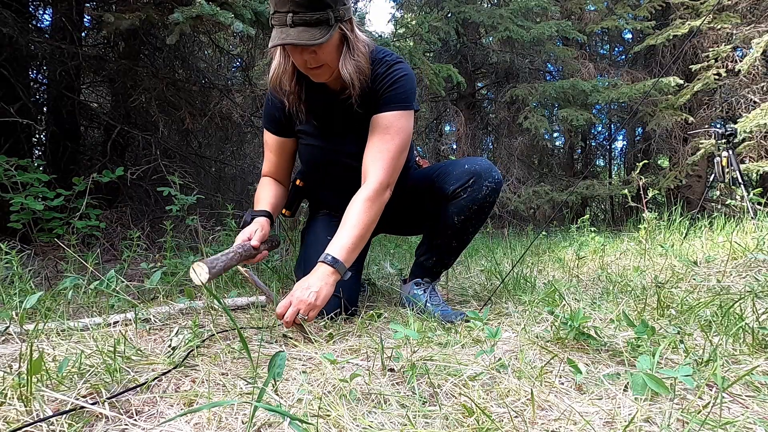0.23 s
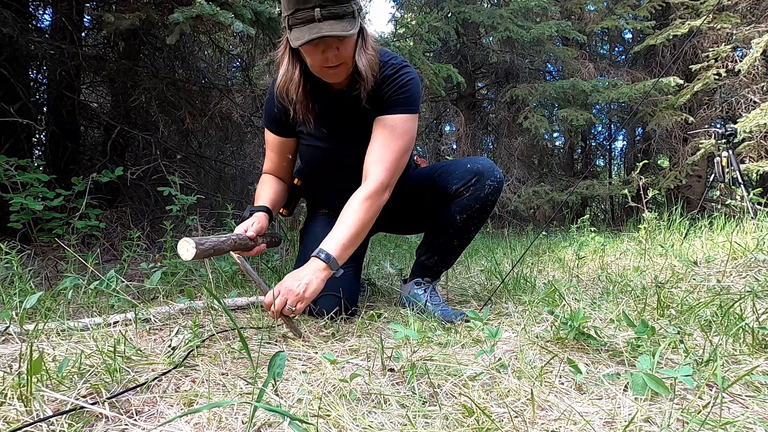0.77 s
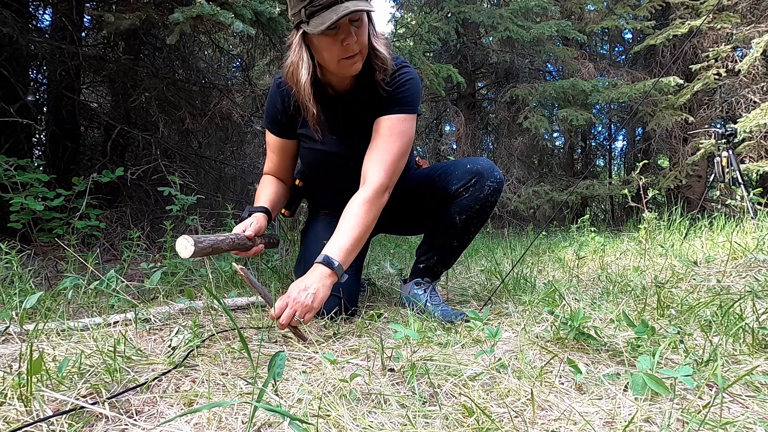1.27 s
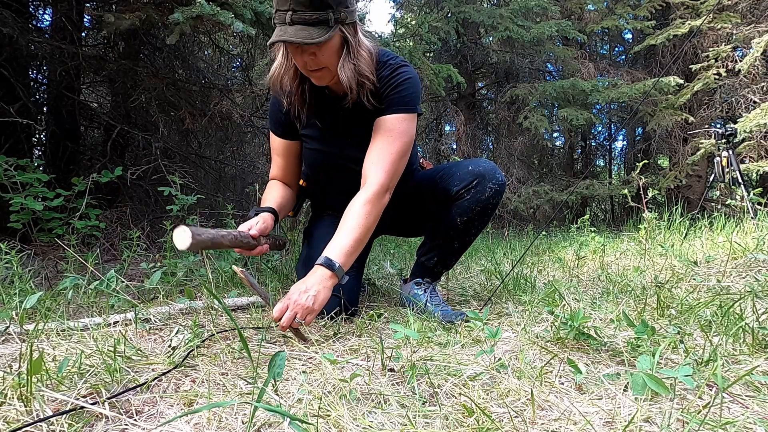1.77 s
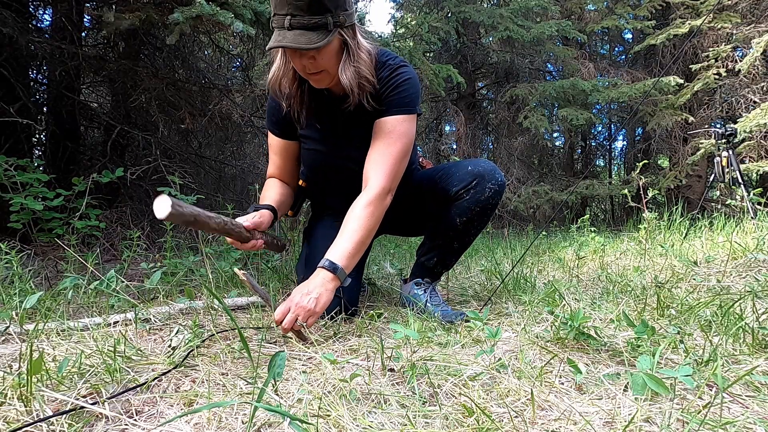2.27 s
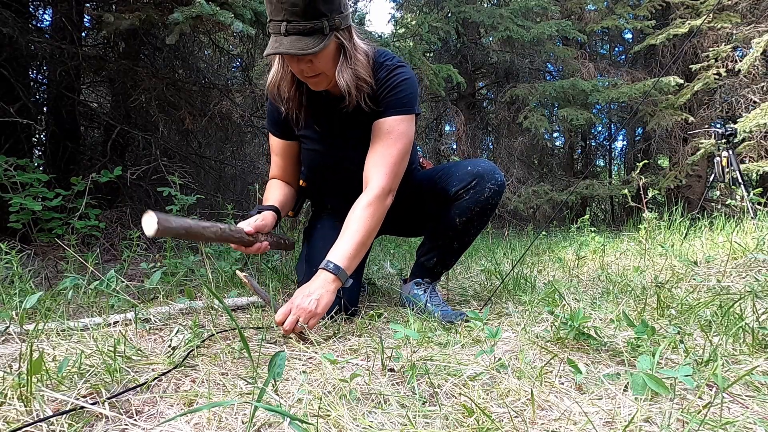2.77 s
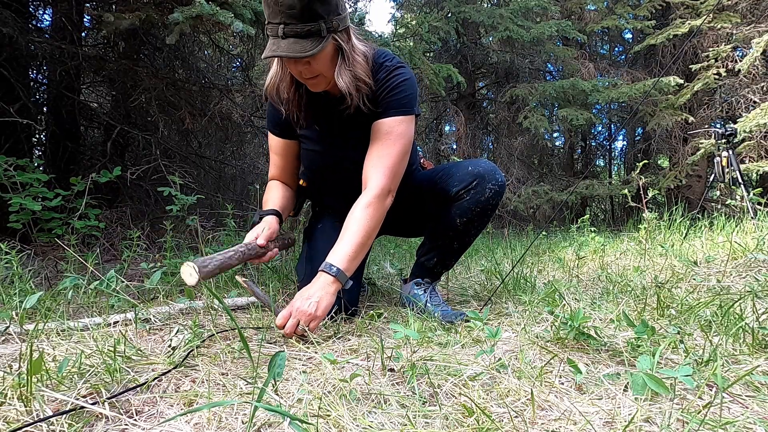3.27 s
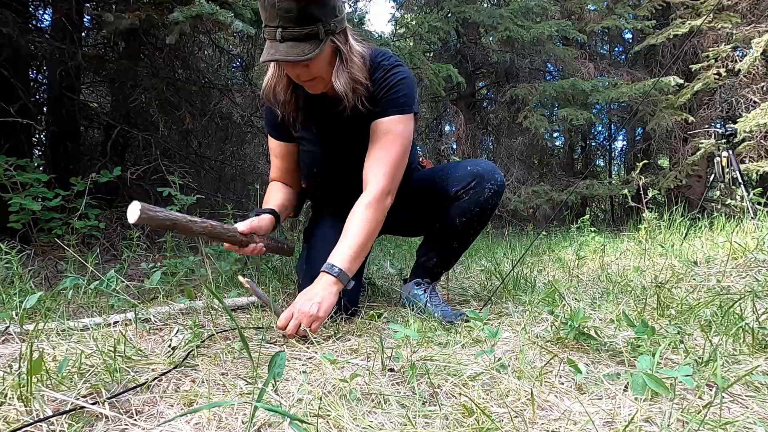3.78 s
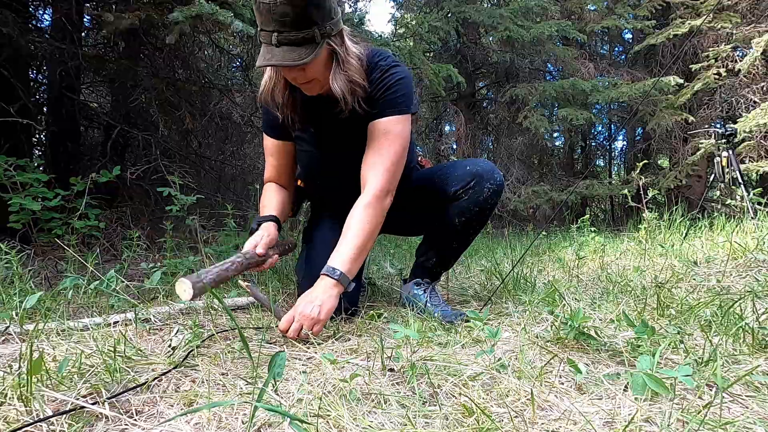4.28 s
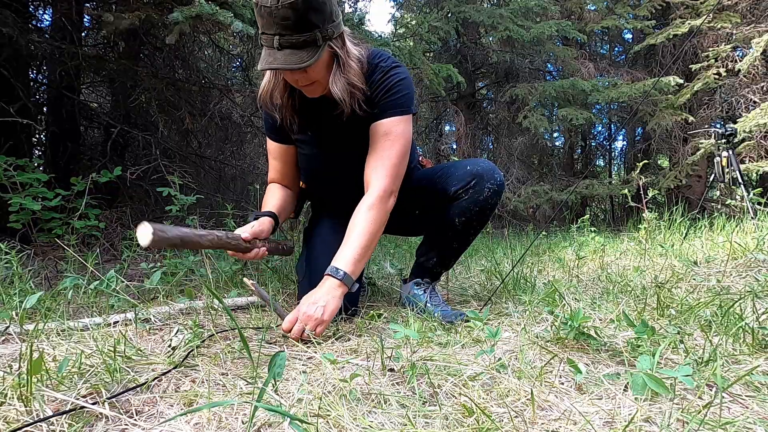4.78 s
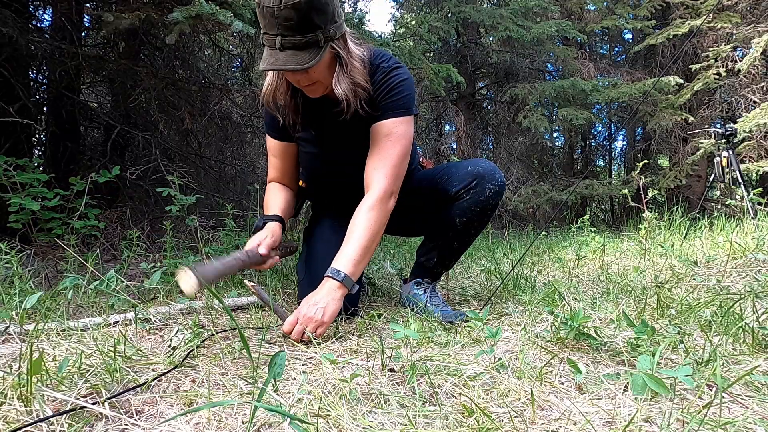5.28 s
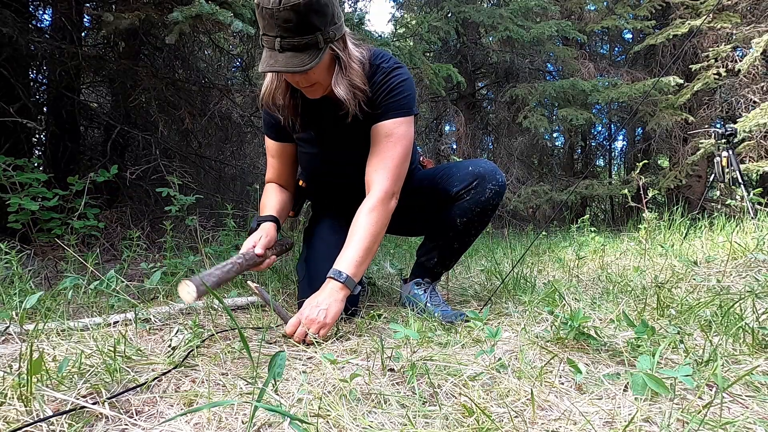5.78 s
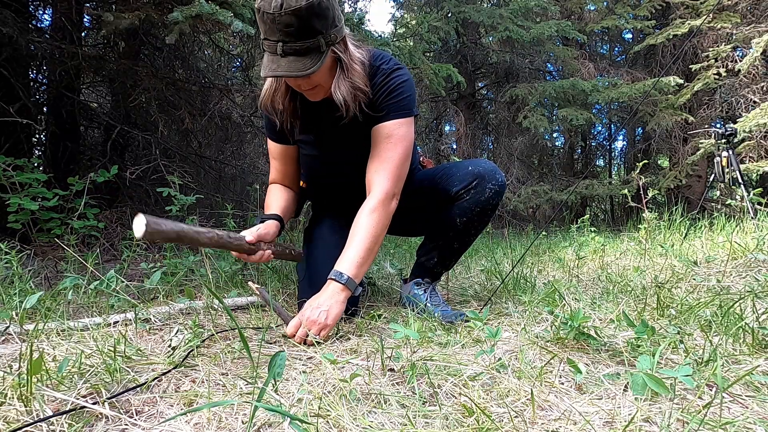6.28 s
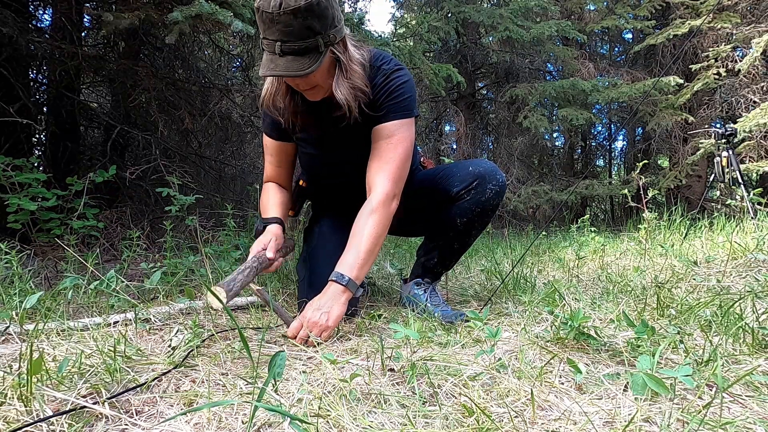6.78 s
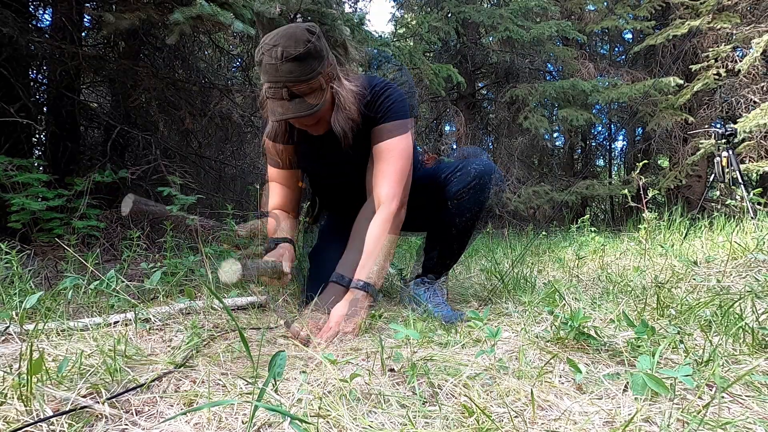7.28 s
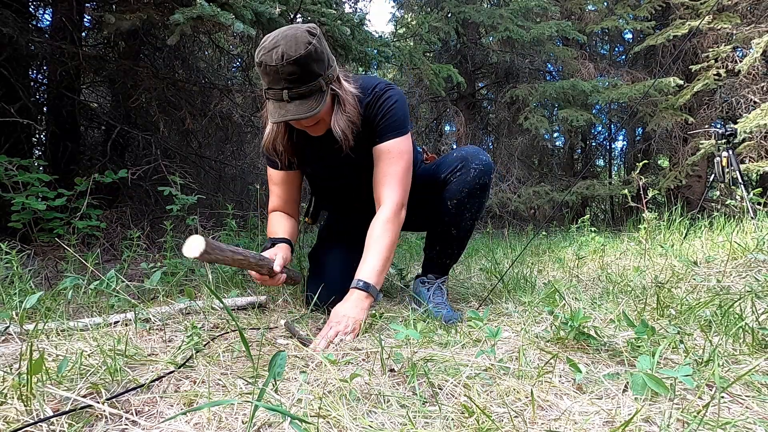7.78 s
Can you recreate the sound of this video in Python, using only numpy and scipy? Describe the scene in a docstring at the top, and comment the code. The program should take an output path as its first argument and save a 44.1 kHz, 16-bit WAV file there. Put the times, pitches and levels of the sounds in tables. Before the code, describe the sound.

A soft hush of outdoor air lies under one light wooden tap and a brief swish of clothes. A log then hammers a wooden stake into the earth in a fast, even rhythm, each knock followed by a tiny crackle of crumbs and dry grass. The thuds grow fuller as the soil grips, and the last three sound firmly seated. The surrounding trees return only a faint echo.

```python
"""A quiet hush of air lies over a forest clearing. A hand-held log taps a wooden stake once, and clothing
rustles. From about two seconds on, steady knocks drive the stake in: each cracks on the bark, rings log
and stake briefly and thumps the ground. Crumbs and dry grass crackle after it, and the trees echo faintly.
The thud grows as the soil grips, until the stake is seated for the last three blows."""
import sys
import numpy as np
from scipy import signal
from scipy.fft import rfft, irfft
from scipy.io import wavfile
from scipy.ndimage import uniform_filter1d

SR = 44100
rng = np.random.default_rng(int(sys.argv[2]) if len(sys.argv) > 2 else 0)


def dump(signal):
    """Clip the signal to [-1, 1] and save it as 16-bit WAV at the path in sys.argv[1]."""
    limited = np.clip(np.atleast_2d(signal).T, -1, 1)
    pcm = np.round(limited * 32767).astype(np.int16)
    wavfile.write(sys.argv[1], SR, pcm)


N = 353682
BLOW_S = .05  # the parts of a blow are levelled by their rms over this time
T = np.arange(int(2 * BLOW_S * SR)) / SR
THUD_DB, LOG_DB, CRACK_DB, PING_DB = -32, -28, -40, -49.5  # base levels, before force, spot and depth
THUD_GROWTH = 1.9  # dB of thud per dB of force: light blows hardly move the soil
GRIP_DB, GRIP_CURVE = 9.5, 1.15  # the thud gains this much on the way down, a little faster late

# The blows. Each row: start in seconds, force in dB over a steady knock, log ring in dB, its centre in Hz,
# ping in dB, bark crack in dB. Ring, ping and crack are offsets set by the spot of the log that lands.
KNOCKS = [(0.4006, -3.5, -13, 1360, -20, -6.5), (1.891, -2.5, -0.5, 1660, 11.5, 0.5),
          (2.1143, -1.5, -11, 1590, -1.5, 1.5), (2.3328, -1.5, 0.5, 1540, 17, 4),
          (2.5622, -0.5, -6, 1110, 4.5, -1), (2.7826, -0.5, 1.5, 1500, 13, 2.5),
          (2.9957, -1.5, 3.5, 1516, 6.5, 3.5), (3.2114, -0.3, -1, 1470, 8.5, -3),
          (3.4167, -1, -2, 1484, -5, -3.5), (3.6184, -1, 1, 1450, 7, 1),
          (3.8308, -0.8, 1.8, 1494, 9.5, 1.5), (4.0275, -1.5, 3, 1497, 13.5, 4.5),
          (4.2283, -0.3, -0.3, 1467, 1.5, -1), (4.4305, -0.14, 0, 1483, 2.5, 1.7),
          (4.6316, -0.4, -2.5, 1500, -4, -0.5), (4.8372, -0.6, 1.9, 1493, 9, 0.5),
          (5.0476, -1, 4.2, 1610, 1, 12), (5.258, -0.5, 0.5, 1486, -4, 3.5),
          (5.4678, -1.5, 5, 1462, 3.5, 1.5), (5.6791, -0.8, 1.9, 1466, -4, -3),
          (5.8849, -0.3, 1, 1470, -3, -1.5), (6.089, 0.24, -3, 1493, -6, 2.3),
          (6.296, -0.6, 1.6, 1610, -18, 5), (6.498, 0, -1.5, 1507, 0.5, 0),
          (6.6979, -0.6, 1.9, 1515, -2, -2), (6.9031, -0.5, 0.2, 1465, 1, 1),
          (7.1098, -0.9, 2.5, 1510, -2, 8), (7.3346, -0.5, 0, 1537, -4, 6.5),
          (7.5662, -0.6, -0.5, 1526, -2, 2), (7.7971, -0.35, -3.5, 1480, 3, 4)]
def knock(s, force_db, ring_db, ring_hz, ping_db, bark_db):
    """One blow: it passes from bark and log through the stake into the ground."""
    depth, (thud_hz, turf_db, turf_hz, stake_db, stake_hz) = footing(s)
    crack_db = CRACK_DB + force_db + bark_db
    thud_db = THUD_DB + THUD_GROWTH * force_db + GRIP_DB * depth ** GRIP_CURVE
    out = np.zeros(len(T))
    add(out, 0, level(crack(), crack_db))
    add(out, 0, level(log_ring(ring_hz, depth), LOG_DB + force_db + ring_db))
    add(out, 0, level(ping(), PING_DB + force_db + ping_db))
    add(out, .0004, level(stake_ring(stake_hz), stake_db + force_db))
    add(out, .00106, level(thud(thud_hz, depth), thud_db))
    add(out, 0, level(turf(turf_hz), thud_db + turf_db))
    # a harder push and a rougher contact both shake more crumbs loose
    add(out, .002, level(crumbs(), (thud_db + crack_db) / 2 - 15.5))
    return out


# Three ways the soil holds the stake. Each gives: thud centre in Hz, turf in dB relative to the thud,
# turf pitch in Hz, stake ring in dB at steady force, its centre in Hz.
LOOSE = (244.5, -22.5, 133, -34.5, 740)
FIRM = (162, -14, 135.5, -32, 785)
SEATED = (225, -6, 231, -27, 641)
def footing(s, drive_from_s=1.9, seated_s=7.2, topsoil_share=0.26):
    """The stake sinks steadily (depth 0-1) and the soil's hold goes from loose to firm to seated."""
    depth = np.clip((s - drive_from_s) / (seated_s - drive_from_s), 0, 1)
    if s > seated_s:
        return depth, SEATED
    loose = np.exp(-(depth / topsoil_share) ** 2)
    return depth, loose * np.array(LOOSE) + (1 - loose) * np.array(FIRM)


# The log's tock. Each row: mode pitch in Hz, relative level in dB, time to fall 60 dB in seconds.
LOG_MODES = [(1076, 0.3, 0.011), (1370, -4, 0.0063), (1630, -24.5, 0.018), (1805, 2.5, 0.0052)]
def log_ring(centre_hz, depth, usual_hz=1470, narrowing=3.2):
    """The log's short ring; spots that sound higher favour a single mode and give a purer tock."""
    spot_octaves = 0.2 * (usual_hz / centre_hz) ** narrowing
    # the barely set stake wobbles, so the log lands askew and rings more broadly
    wobble_octaves = 0.23 * np.exp(-depth / 0.15)
    return ring(LOG_MODES, centre_hz, spot_octaves + wobble_octaves, contact_s=0.0017, scatter=0.033)


# The ground's thump. Each row: mode pitch at half depth in Hz, relative level in dB,
# time to fall 60 dB at full depth in seconds.
GROUND_MODES = [(136.6, -2, .0138), (163.6, .5, .0102), (263, -11.7, .0176), (354, -20, .0176),
                (554, 1.1, .0066)]
def thud(centre_hz, depth, stiffening_octaves=0.11, loose_damping_db_per_s=1500):
    """The stake shoves the ground, which rings longer and higher as the soil packs and stiffens."""
    stiffer = 2 ** (stiffening_octaves * (depth - .5))
    modes = [(hz * stiffer, db, t60) for hz, db, t60 in GROUND_MODES]
    damping = undb(-loose_damping_db_per_s * (1 - depth) ** 2 * T)
    shove = ring(modes, centre_hz * stiffer, octaves=0.6645, contact_s=.00005, scatter=0.038) * damping
    return butter(shove, 1, 53, "high")  # the stake moves too little soil to give deep bass


# The stake's hollow note. Each row: mode pitch in Hz, relative level in dB, time to fall 60 dB in seconds.
STAKE_MODES = [(685, 2.5, 0.035), (803, -0.5, 0.048)]
def stake_ring(centre_hz):
    """The struck stake rings at nearly the same pitches on every blow."""
    return ring(STAKE_MODES, centre_hz, octaves=0.15, contact_s=0.00054, scatter=.007)


# The bite of the bark. Each row: frequency in Hz, gain in dB.
CRACK_EQ = [(300, 10), (1000, -3), (1800, 3.5), (2500, 5), (3600, 0.5), (4500, 2.5), (6000, -4),
            (8000, -13.5), (11000, -19.5), (14000, -40)]
def crack(tick_t60=0.0007, crush_t60=0.015, crush_db=-7, rise_s=0.00004):
    """A sharp tick at first contact; then bark and end grain crush for a few milliseconds."""
    decay = fade(T, tick_t60) + undb(crush_db) * fade(T, crush_t60)
    attack = 1 - np.exp(-T / rise_s)
    return colour(rng.standard_normal(len(T)) * decay * attack, CRACK_EQ)


# The wood's bright edge. Each row: mode pitch in Hz, relative level in dB, time to fall 60 dB in seconds.
PING_MODES = [(3025, 4.3, 0.019), (3264, 2, 0.014)]
def ping():
    """A short, high ring of the struck wood."""
    return ring(PING_MODES, contact_s=0.00088, scatter=.012)


def turf(hz, cycles=1.42, steepness=0.79):
    """The springy turf round the stake swells and settles in a few cycles; stiffer turf stops sooner."""
    age = T * hz / cycles
    return np.sin(2 * np.pi * hz * T) * (age * np.exp(1 - age)) ** steepness


# The tone of the crackle. Each row: frequency in Hz, gain in dB.
CRUMBS_EQ = [(300, 8), (1200, 6), (3000, -2.5), (6000, -10.5), (11000, -17.5), (14000, -39)]
def crumbs(length_s=0.019, spread_db=2.0):
    """Bark crumbs, soil grains and dry grass crackle while the stake slides."""
    grains = rng.standard_normal(len(T)) * undb(spread_db * rng.exponential(size=len(T)))
    return colour(grains * np.exp(-(T / length_s) ** 2), CRUMBS_EQ)


# A dull bump. Each row: start in seconds, thud level in dB, thud centre in Hz, crack level in dB.
REBOUNDS = [(6.951, -42, 204, -62)]
def rebound(s, thud_db, thud_hz, crack_db):
    """The log drops back on the stake and mutes it: only ground and bark sound."""
    depth, _ = footing(s)
    return level(thud(thud_hz, depth), thud_db) + level(crack(), crack_db)


# The tone of the tail among the trees. Each row: frequency in Hz, gain in dB.
TREES_EQ = [(60, 9), (170, 1), (400, -18.5), (800, -4.5), (1400, -2.5), (3000, 2.5), (6000, -2.5),
            (12000, -16.5)]
def forest(x, echo_s=.0232, tail_db=-30, t60=0.25, build_s=0.035):
    """The nearest trunks return one echo; those behind scatter a thin tail."""
    t = np.arange(SR) / SR
    envelope = fade(t, t60) * (1 - np.exp(-t / build_s))
    tail = colour(rng.standard_normal(SR) * envelope, TREES_EQ)
    response = undb(tail_db) * tail / np.sqrt(np.sum(tail ** 2))
    bassy_echo = colour(signal.unit_impulse(len(T)), [(150, 17.0), (300, 5), (1400, -4.5), (4000, 1)])
    add(response, echo_s, undb(-31) * bassy_echo)
    return signal.fftconvolve(x, response)[:N]


# The swish of clothing. Each row: frequency in Hz, gain in dB.
CLOTH_EQ = [(1000, -16), (4000, 4), (7000, -1), (11000, -10), (14000, -22)]
def rustle(peak_s=0.95, length_s=0.31, db=-61, grain_db=3.5):
    """Cloth slides over cloth in a short, uneven swell of fine grains."""
    grains = colour(rng.standard_normal(N) * undb(grain_db * rng.exponential(size=N)), CLOTH_EQ)
    swell = np.exp(-(2 * (np.arange(N) / SR - peak_s) / length_s) ** 2)
    flutter_db = 2.2 * walk(40)
    return grains / np.std(grains) * swell * undb(db + flutter_db)


# The tone of the air. Each row: frequency in Hz, gain in dB.
AIR_EQ = [(15, -75), (25, -56), (58, -6), (168, -0.5), (202, -0.5), (231, 0), (317, -8.5), (511, -11),
          (891, -9), (1020, -6.5), (3010, -14), (4250, -15), (6150, -21), (11600, -38), (14000, -39)]
# The ride on the hush. Each row: time in seconds, body level in dB, hiss level in dB, both before trim.
HUSH_LEVELS = [(0, -55, -61.5), (1.0, -55.5, -61.5), (2.0, -55, -66), (3.2, -56, -70.5), (5.1, -56, -68),
               (6.9, -56.5, -70.5), (7.4, -55, -66), (8.02, -56.5, -64.5)]
def air(split_hz=2500, body_trim_db=3.5, hiss_trim_db=1):
    """A soft outdoor hush whose body and hiss waver slightly and separately."""
    times, body_db, hiss_db = np.transpose(HUSH_LEVELS)
    out = 0
    for side, curve_db in (("low", body_db + body_trim_db), ("high", hiss_db + hiss_trim_db)):
        band = butter(colour(rng.standard_normal(N), AIR_EQ), 2, split_hz, side)
        ride_db = np.interp(np.arange(N) / SR, times, curve_db)
        waver_db = .5 * walk(9)
        out = out + band / np.std(band) * undb(ride_db + waver_db)
    return out


def ring(modes, centre_hz=None, octaves=1, *, contact_s, scatter):
    """Neighbouring modes start in opposite directions; the spot hit favours those near centre_hz."""
    out = 0
    grip = 1 + scatter * rng.standard_normal()  # the grip shifts all modes together from blow to blow
    for k, (hz, db, t60) in enumerate(modes):
        weight = np.exp(-.5 * (np.log2(hz / centre_hz) / octaves) ** 2) if centre_hz else 1
        mode = np.sin(2 * np.pi * hz * grip * T) * fade(T, t60)
        out = out + (-1) ** k * weight * undb(db) * mode
    return out * (1 - np.exp(-(T / contact_s) ** 2))


def undb(db):
    """Decibels to gain."""
    return 10 ** (np.asarray(db) / 20)


def level(x, db):
    """Scale a short sound to an rms level over BLOW_S."""
    return x * undb(db) * np.sqrt(BLOW_S * SR / np.sum(x ** 2))


def fade(t, t60):
    """Exponential decay, 60 dB down after t60."""
    return np.exp(-np.log(1000) * t / t60)


def add(out, s, x):
    """Mix x into out from time s on."""
    i = max(int(round(s * SR)), 0)
    out[i:i + len(x)] += x[:max(len(out) - i, 0)]


def butter(x, order, hz, side):
    """Smooth low-pass or high-pass."""
    return signal.sosfilt(signal.butter(order, hz, side, fs=SR, output="sos"), x)


def colour(x, points, size=4096):
    """Causal EQ through the given (Hz, dB) points."""
    hz, db = np.transpose(points)
    bins = np.maximum(np.arange(size // 2 + 1) * SR / size, 1)
    gain = undb(np.interp(np.log(bins), np.log(hz), db))
    cepstrum = irfft(np.log(gain))
    cepstrum[1:size // 2] *= 2  # minimum phase: nothing rings ahead of a hit
    cepstrum[size // 2 + 1:] = 0
    return signal.fftconvolve(x, irfft(np.exp(rfft(cepstrum))))[:len(x)]


def walk(rate_hz):
    """Smooth random drift with a spread near 1."""
    step = int(SR / rate_hz)
    return uniform_filter1d(np.repeat(rng.standard_normal(N // step + 1), step), step)[:N]


def scene():
    """All blows, their echo, the air and a rustle of clothing, in mono."""
    blows = np.zeros(N)
    for s, *blow in KNOCKS:
        add(blows, s, knock(s, *blow))
    for s, *bump in REBOUNDS:
        add(blows, s, rebound(s, *bump))
    return (blows + forest(blows) + air() + rustle())[None]


def record(dry):
    """The microphone drops the bass below 64 Hz and the top above 13.8 kHz."""
    top_cut = signal.ellip(8, .2, 70, 13800, fs=SR, output="sos")
    return signal.sosfilt(top_cut, butter(dry, 3, 64, "high"))


dry = scene()
out = record(dry)
dump(out)
```